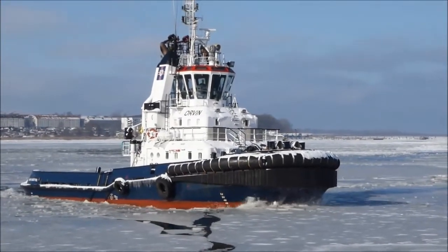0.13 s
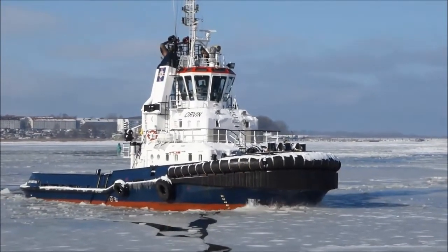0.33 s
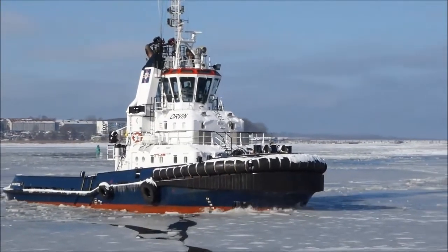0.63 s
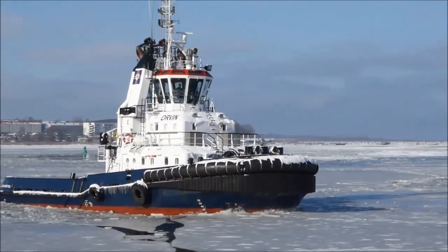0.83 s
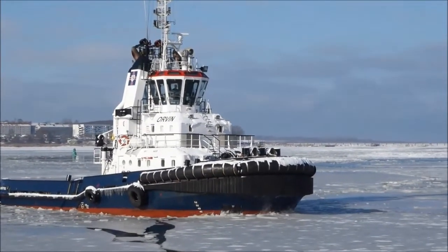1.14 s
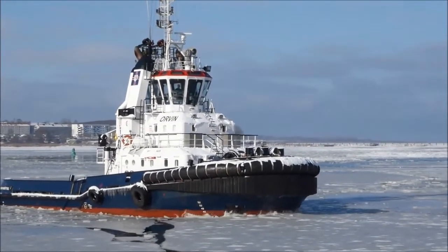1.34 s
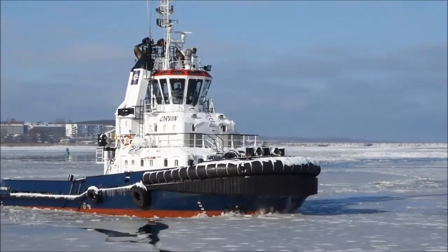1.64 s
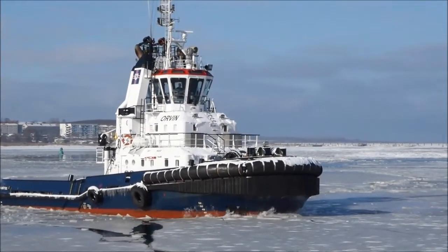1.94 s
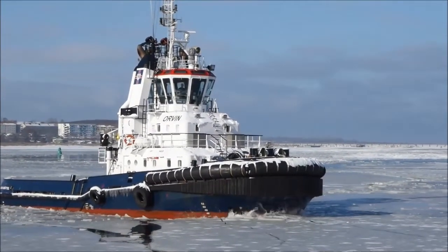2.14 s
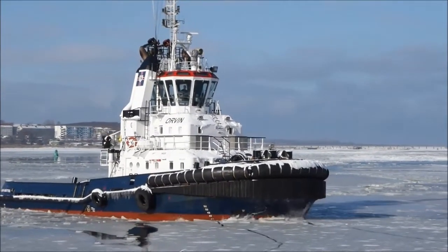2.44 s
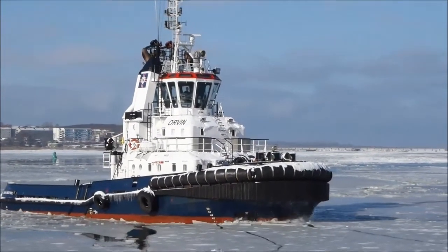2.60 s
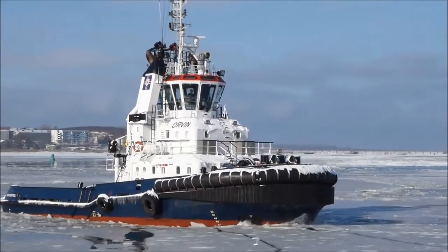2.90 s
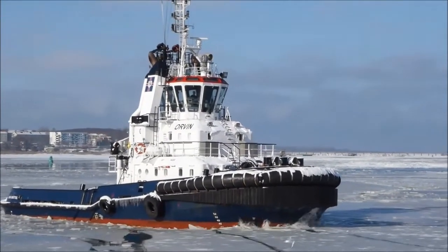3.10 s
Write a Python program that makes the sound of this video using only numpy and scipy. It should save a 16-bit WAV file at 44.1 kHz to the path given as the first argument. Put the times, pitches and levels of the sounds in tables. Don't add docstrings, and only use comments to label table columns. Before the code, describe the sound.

A tug's low diesel roar with ice snapping and floes knocking on the hull, light wind

```python
import sys
import numpy as np
from scipy import signal
from scipy.fft import rfft, irfft, next_fast_len
from scipy.io import wavfile
from scipy.ndimage import uniform_filter1d

SR = 44100
rng = np.random.default_rng(int(sys.argv[2]) if len(sys.argv) > 2 else 0)


def wrap_up_sound(samples):
    columns = np.atleast_2d(samples).T
    tamed = np.clip(columns, -1, 1)
    steps = np.round(tamed * 32767).astype(np.int16)
    wavfile.write(sys.argv[1], SR, steps)


def rack_gain(trim_db):
    fader = np.asarray(trim_db, float)
    return 10 ** (fader / 20)


N = 143766
TIME = np.arange(N) / SR

# frequency in Hz, level in dB per Hz.
CRUSH_SPECTRUM = [(500, -10), (1300, -6), (2200, -5), (3100, -5), (3700, -6), (4900, -7.5), (6600, -14),
                  (8300, -18)]


def evened(x):
    return x / np.sqrt(np.mean(x ** 2) + 1e-20)


def read(points, hz):
    f, value = np.transpose(points)
    return np.interp(np.log(hz + 1), np.log(f + 1), value)


def curve(table, column):
    rows = np.array(table)
    return np.interp(TIME, rows[:, 0], rows[:, column])


def slope(points, hz, fall_db):
    octaves_above = np.log2(np.maximum(hz / points[-1][0], 1))
    return rack_gain(read(points, hz) - fall_db * octaves_above)


def colour(x, gain):
    size = next_fast_len(N + 4096)
    hz = np.fft.rfftfreq(size, 1 / SR)
    return irfft(rfft(x, size) * gain(hz), size)[..., :N]


def drift(rate_hz):
    f = np.geomspace(rate_hz / 20, rate_hz, 24)[:, None]
    sines = np.sin(2 * np.pi * (f * TIME + rng.random((24, 1))))
    return evened((sines / np.sqrt(f)).sum(0))


def noise(points, size, fall_db, patch_db, flicker_db, bins, frames):
    count = 4 * N // size + 5
    hz = np.fft.rfftfreq(size, 1 / SR)
    a, b, c, d, patch = rng.standard_normal((count, len(hz), 5)).T
    patch = uniform_filter1d(patch, bins, 0)
    patch = evened(uniform_filter1d(patch, frames, 1))
    flicker = evened(uniform_filter1d(rng.standard_normal(count), frames))
    z = np.array([a + 1j * b, c + 1j * d]) * slope(points, hz, fall_db)[:, None]
    z = z * rack_gain(patch_db * patch + flicker_db * flicker)
    x = signal.istft(z, nperseg=size, noverlap=size * 3 // 4)[1]
    return evened(x[:, :N])


def burst(rows, rise_s, t60_s):
    rows = np.array(rows)
    t = np.maximum(TIME - rows[:, :1], 0)
    fall = rack_gain(rows[:, 1:2] - 60 * t / t60_s)
    return fall * (1 - np.exp(-t / rise_s)) ** 2


def ring(x, hz, width_hz):
    r = np.exp(-np.pi * width_hz / SR)
    return evened(signal.lfilter([1, 0, -1], [1, -2 * r * np.cos(2 * np.pi * hz / SR), r * r], x))


def engine():
    # time in seconds, engine load in dB, exhaust tone in dB.
    load = [(0, -20.5, -27.5), (.25, -19.5, -26.5), (.45, -19.5, -26.5), (.7, -20.5, -28),
            (1.0, -20, -27.5), (1.3, -21.5, -31.5), (1.5, -19.5, -32.5), (1.7, -21.5, -27.5),
            (1.85, -19, -27), (2.1, -20, -40), (2.35, -21, -22), (2.6, -23.5, -34.5), (2.9, -25, -28.5),
            (3.26, -25, -29)]
    # frequency in Hz, roar in dB per Hz.
    roar_spectrum = [(50, -39), (100, -17), (150, -1), (260, 1), (400, -3), (510, -13), (740, -8.5),
                     (1250, -23.5)]
    tone_hz, wander_hz, waver_db = 241.2, 1.2, 2.5
    fuzz_width_hz, fuzz_db = 8, -5.0

    roar = noise(roar_spectrum, size=2048, fall_db=20.5, patch_db=1.0, flicker_db=.5, bins=4, frames=5)
    turns = np.cumsum(tone_hz + wander_hz * drift(8.1)) / SR
    pure = np.sqrt(2) * np.sin(2 * np.pi * turns) * rack_gain(waver_db * drift(13))
    fuzz = ring(rng.standard_normal(N), tone_hz, fuzz_width_hz)
    fuzz = ring(fuzz, tone_hz, 3 * fuzz_width_hz)
    tone = pure + rack_gain(fuzz_db) * fuzz
    return roar * rack_gain(curve(load, 1) + 0.5), tone * rack_gain(curve(load, 2))


def splinters():
    grains_per_s, spread_db, t60_s = 2200, 2.2, .05
    sizes = rack_gain(spread_db * np.minimum(rng.exponential(1, N), 4))
    hits = sizes * (rng.random(N) < grains_per_s / SR)
    signed = hits * rng.choice([-1., 1.], N)
    flutter = signal.lfilter([1], [1, -rack_gain(-60 / (t60_s * SR))], signed)
    grit = noise(CRUSH_SPECTRUM, size=512, fall_db=31, patch_db=4.0, flicker_db=-2.8, bins=12, frames=3)
    return evened(flutter * grit)


def slush():
    hz, width_hz = 4130, 1100
    level_db, bite_s, bite_gain_db = -18.5, 1.72, 9.5
    wet = ring(rng.standard_normal((2, N)), hz, width_hz)
    wet = ring(wet, hz, 2 * width_hz)
    bite = np.clip((TIME - bite_s) / .08, 0, 1)
    return wet * rack_gain(level_db + bite_gain_db * bite)


def crush():
    # time in seconds, ice pressure on the bow in dB.
    pressure = [(0, -42), (.22, -41), (.3, -40.5), (.35, -41.5), (.43, -38.5), (.6, -42), (.76, -40),
                (1.0, -43), (1.3, -41.5), (1.7, -44), (1.78, -37), (1.9, -41), (2.05, -40.5), (2.3, -43.5),
                (2.5, -39), (2.58, -44.5), (2.95, -43), (3.26, -44)]
    splinter_db = -9
    wash = noise(CRUSH_SPECTRUM, size=512, fall_db=17, patch_db=0.5, flicker_db=0.73, bins=8, frames=12)
    ice = wash + slush() + rack_gain(splinter_db) * splinters()
    return ice * rack_gain(curve(pressure, 1) + 2.5)


def cracks():
    # start in seconds, peak in dB, ring in Hz, thump in dB.
    snaps = [(0.0159, -32, 2280, -1), (0.114, -21.5, 3140, -3), (0.1346, -27, 2690, 2),
             (0.185, -25, 2970, -1), (0.2994, -34, 2640, -7), (0.3651, -24.5, 3030, -15),
             (0.3845, -25, 2470, 5), (0.4077, -26, 2410, 0), (0.43, -26, 2520, 5), (0.5063, -24, 2890, -19),
             (0.5586, -25, 2660, -2), (0.625, -27, 2400, -4), (0.758, -36, 2900, 5),
             (0.9497, -28, 2640, -7), (1.0737, -26.5, 3100, -3), (1.1618, -25.5, 2740, -12),
             (1.2535, -33, 2540, -12), (1.368, -24.5, 2860, 7), (1.498, -28, 2880, 6),
             (1.5873, -31, 2620, -6), (1.7619, -30, 2700, 9), (1.7994, -35, 2460, -14),
             (1.8394, -33, 2350, -4), (1.8794, -26, 2330, -4), (1.9694, -32, 2610, -14),
             (2.3565, -29, 2360, 4), (2.411, -26, 2870, -4), (2.53, -36, 3980, 9), (2.6294, -34, 2340, -11),
             (2.9194, -28, 2650, -2)]
    rise_s, t60_s, ring_width_hz, level_db = 0.0006, 0.052, 395, -6

    white = rng.standard_normal((2, N))
    wide = evened(colour(white, lambda hz: slope(CRUSH_SPECTRUM, hz, 35.0)))
    dull = ring(ring(white, 600, 380), 700, 900)
    total = np.zeros((2, N))
    for shape, (_, _, ring_hz, thump_db) in zip(burst(snaps, rise_s, t60_s), snaps):
        ringing = 0.61 * ring(wide, ring_hz, ring_width_hz)
        total += shape * (wide + ringing + rack_gain(thump_db + 7.5) * dull)
    return rack_gain(level_db) * total


def hull_blows(rows, rise_s, t60_s, width_hz, level_db):
    white = rng.standard_normal((2, N))
    total = np.zeros((2, N))
    for shape, (start_s, _, hz) in zip(burst(rows, rise_s, t60_s), rows):
        fuzz = ring(ring(white, hz, width_hz), hz, 3 * width_hz)
        total += shape * (np.sin(2 * np.pi * hz * (TIME - start_s)) + .35 * fuzz)
    return rack_gain(level_db) * total


def thuds():
    # start in seconds, peak in dB, mode in Hz.
    heavy_floes = [(0.088, -1, 230), (0.202, -3.5, 258), (0.366, -2, 375), (0.415, -8, 280),
                   (0.491, -10, 224), (0.564, -2.5, 340), (0.632, -22, 230), (0.793, -8, 243),
                   (0.884, -9, 234), (1.165, -2.5, 303), (1.48, -6.5, 234), (1.606, -21, 242),
                   (1.771, -4.5, 225), (1.873, -6, 253), (2.02, -3, 189), (2.129, -23, 245),
                   (2.742, -14, 243)]
    return hull_blows(heavy_floes, rise_s=0.0036, t60_s=0.12, width_hz=70, level_db=-3)


def knocks():
    # start in seconds, peak in dB, mode in Hz.
    small_floes = [
        (0.203, -22, 572),
        (0.419, -15, 740),
        (0.634, -12, 664),
        (1.049, -16.5, 647),
        (1.163, -10.5, 571),
        (1.497, -17, 620),
        (1.773, -13, 614),
        (1.983, -13, 734),
        (2.489, -28.5, 630),
        (3.034, -26, 636),
    ]
    return hull_blows(small_floes, rise_s=0.004, t60_s=0.091, width_hz=200, level_db=-1.5)


def wake():
    # frequency in Hz, hiss in dB per Hz.
    hiss_spectrum = [(3000, -10.5), (6000, 1), (8300, -7), (9300, 2.5), (10600, 2.5), (12000, -10),
                     (13500, -41), (15500, -40)]
    level_db, swell_db_per_s = -48.5, 0.9
    hiss = noise(hiss_spectrum, size=512, fall_db=35, patch_db=2.5, flicker_db=0.0, bins=10, frames=16)
    return hiss * rack_gain(level_db + .5 * drift(2.2) + swell_db_per_s * TIME + 0.1)


def wind():
    # time in seconds, gust in dB.
    gust = [(0, -42), (.3, -34.5), (.5, -65), (.8, -55), (1.15, -37), (1.4, -42), (1.8, -31.5),
            (2.2, -28.5), (2.55, -28), (2.95, -32.5), (3.15, -31), (3.26, -27)]
    # frequency in Hz, wind in dB per Hz.
    wind_spectrum = [(25, -28), (50, -33), (95, -16), (140, 3), (230, 4.5), (400, -5.5), (600, -14),
                     (900, -36)]
    lumps = noise(wind_spectrum, size=1024, fall_db=30, patch_db=1.5, flicker_db=-1.0, bins=3, frames=8)
    return lumps * rack_gain(curve(gust, 1) + 3.0)


def scene():
    # frequency in Hz, left-right likeness from 0 to 1.
    likeness = [(80, 0.81), (250, 1), (520, 0.97), (740, 0.95), (1700, .6), (2600, 0.95), (6500, 0.62),
                (11000, .74)]

    def same(hz):
        return np.clip(read(likeness, hz), 0, 1)

    roar, tone = engine()
    direct, diffuse = roar + crush() + cracks() + thuds() + knocks() + wake()
    right = colour(direct, same) + colour(diffuse, lambda hz: np.sqrt(1 - same(hz) ** 2))
    return np.array([direct, right]) + tone + wind()


def low_pass(x):
    return signal.sosfilt(signal.butter(12, 15100, fs=SR, output="sos"), x)


def record(dry):
    # frequency in Hz, colour of the port in dB.
    left_port = [(700, 1), (1050, 6), (1300, 0), (1620, 0.5), (2000, 6), (2500, 0.5), (5000, -8),
                 (12000, -8.5)]
    right_port = [(700, 1), (1100, 0.5), (1550, 5), (1860, -3.5), (2250, -0.5), (3000, -4), (5000, -10.5),
                  (12000, -8.5)]
    # frequency in Hz, phase lead of the left port in radians.
    left_lead = [(800, 0), (1000, -.9), (1460, -3.8), (1800, -4.1), (2000, -5.6), (3000, -5.75),
                 (4300, -6.28), (12000, -6.28)]
    low_cut_hz, limit = 64, 1.2

    cut = colour(dry, lambda hz: np.maximum(1 / np.sqrt(1 + (low_cut_hz / (hz + 1)) ** 6), .3))
    left = colour(cut[0], lambda hz: rack_gain(read(left_port, hz)) * np.exp(1j * read(left_lead, hz)))
    right = colour(cut[1], lambda hz: rack_gain(read(right_port, hz)))
    mix = limit * np.tanh(np.array([left, right]) / limit)
    return low_pass(mix)


dry = scene()
out = record(dry)
wrap_up_sound(out)
```